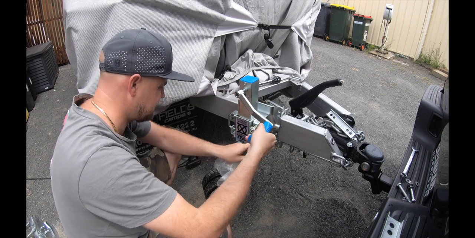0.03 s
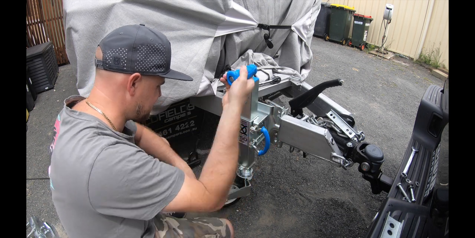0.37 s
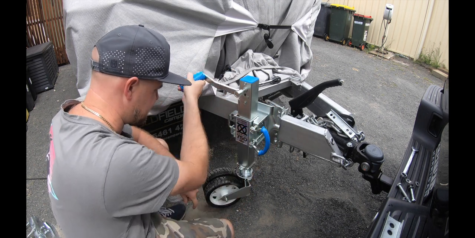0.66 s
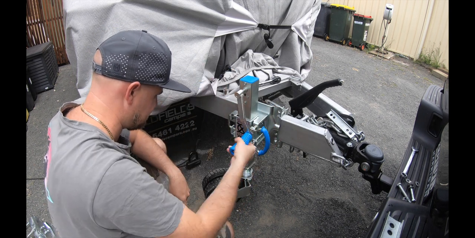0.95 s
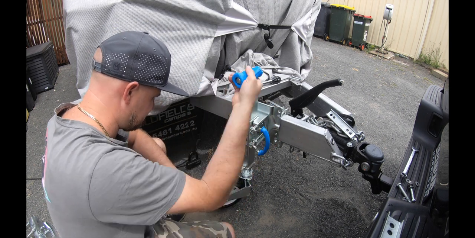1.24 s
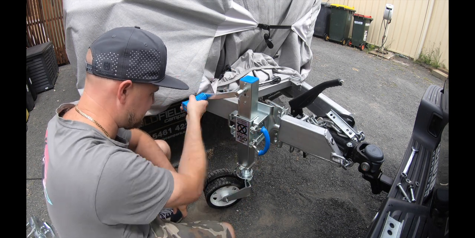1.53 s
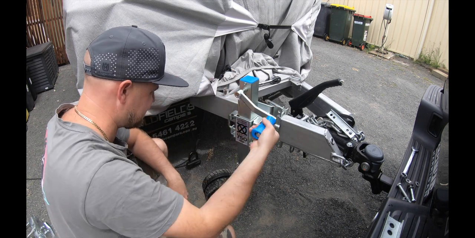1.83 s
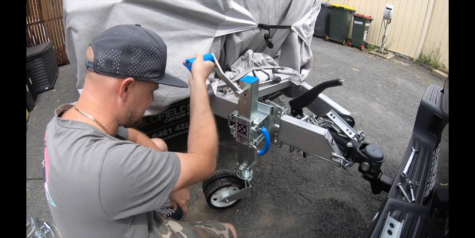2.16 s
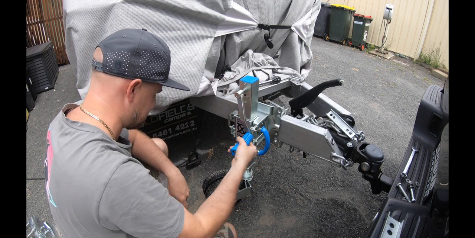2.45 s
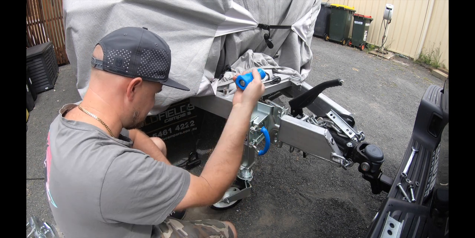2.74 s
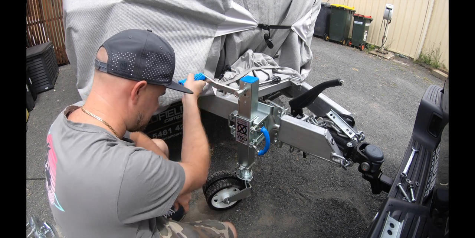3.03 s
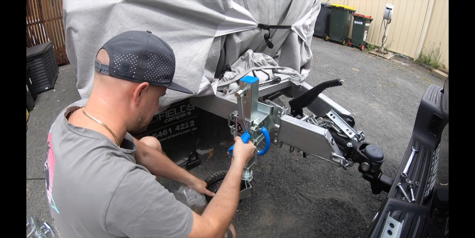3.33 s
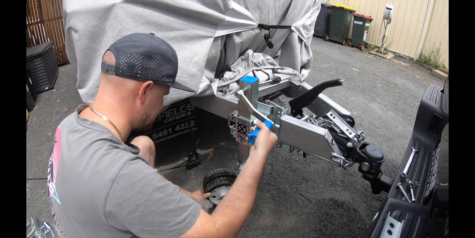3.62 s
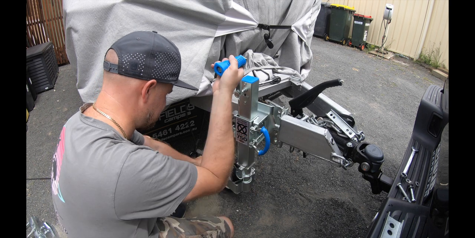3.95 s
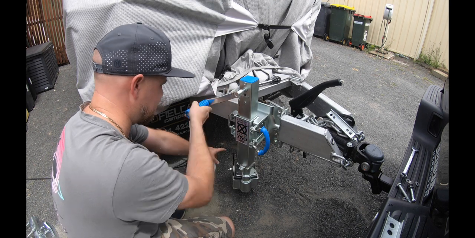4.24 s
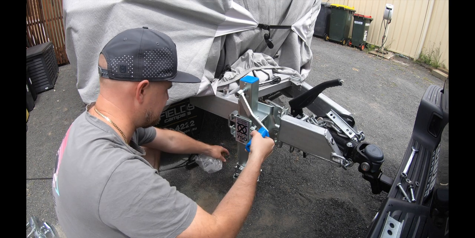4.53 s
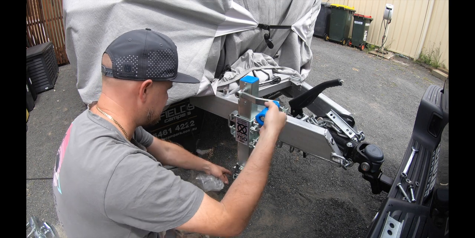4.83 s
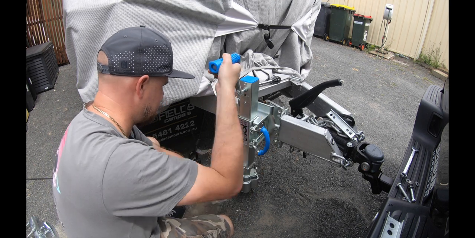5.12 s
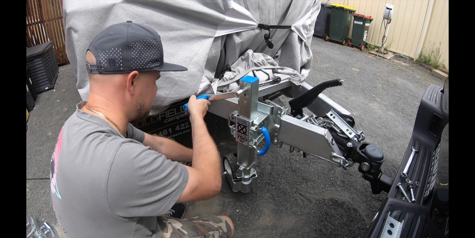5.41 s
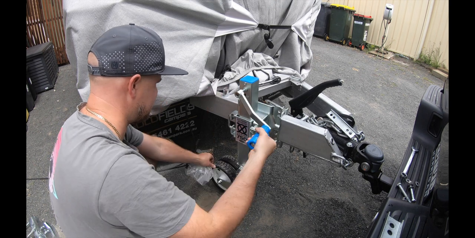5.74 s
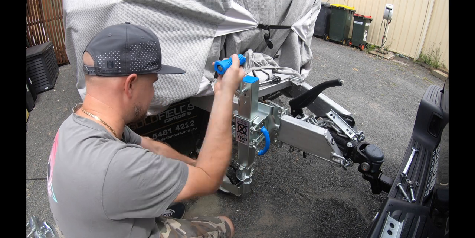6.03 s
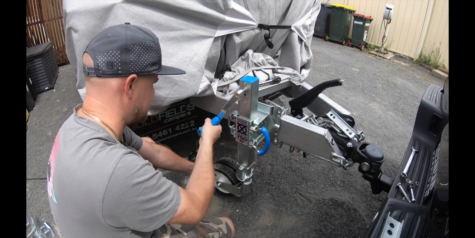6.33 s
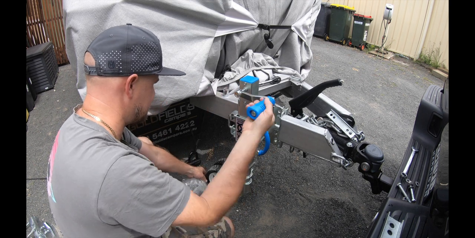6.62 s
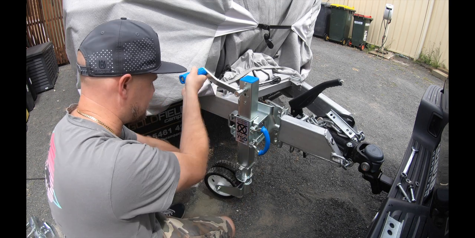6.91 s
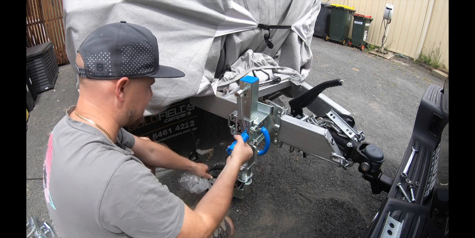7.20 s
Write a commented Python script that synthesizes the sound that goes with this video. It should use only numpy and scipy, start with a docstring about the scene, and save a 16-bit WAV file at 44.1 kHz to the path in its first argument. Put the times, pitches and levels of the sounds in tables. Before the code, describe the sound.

A trailer's jockey wheel is cranked outdoors, with repeated metal clanks, knocks and ticks over a low wind rumble.

```python
"""A paved yard, a stereo camera microphone close to the crank of a trailer's jockey wheel.
Light ticks come first. Then, turn after turn, the screw rubs through a tight spot and clanks in its
tube, the drawbar booms, and mostly the loose handle flops over with a knock. Just after 3 s the
rumbling breeze buffets the microphone, and by 4.5 s the image has narrowed to mono. At 5.3 s the screw
squeals into its heaviest clank; a loose steel part clinks brightly before the last turn."""
import sys
import numpy as np
from scipy import signal
from scipy.fft import rfft, irfft, next_fast_len
from scipy.io import wavfile
from scipy.ndimage import uniform_filter1d, map_coordinates

SR = 44100
rng = np.random.default_rng(int(sys.argv[2]) if len(sys.argv) > 2 else 0)


def inscribe(sig):
    """Save sig as 16-bit PCM at rate SR to the path in sys.argv[1].

    A 1-D sig is mono; a 2-D sig holds one channel per row.
    Samples are clipped to [-1, 1] before scaling.
    """
    pcm = np.round(np.clip(np.atleast_2d(sig).T, -1, 1) * 32767)
    wavfile.write(sys.argv[1], SR, pcm.astype(np.int16))


N = 320607
AGE = np.arange(SR // 2) / SR  # seconds since a blow
LEAD_S = 0.03  # room for the drag ahead of a blow


# The screw's tube, close up (levels in all tables are relative). Modes: pitch_hz, level_db, t60_s
TUBE_MODES = [(1283, -12, 0.21), (1480, -19, 0.15), (1760, -3, 0.1), (1990, 2.5, 0.12), (2060, -3, 0.078),
              (2340, -8.5, 0.1), (2710, -1, 0.08), (2790, -8, .1), (3260, -2, 0.11), (3750, 0.5, 0.084),
              (4100, -10, 0.12), (4830, -17, 0.17), (7550, -17, 0.094), (8100, -29, .16)]
# Its dense ring: frequency_hz, level_db
TUBE_CONTACT = [(200, -7), (350, -7), (680, -4), (880, -10.5), (1400, -5.5), (1700, -4), (2000, -6),
                (2400, -2), (2700, -4.5), (3300, -5), (3850, -7.5), (4350, -15.5), (5600, -21), (6800, -28),
                (8200, -29.5), (9500, -43), (13000, -52)]
# Blows on the tube: start_s, level_db, treble_db, clunk_db, boom_db, body_db, drag_s, chatter_s
CLANKS = [(0.5345, -31.5, -54.5, -46, -41, -5, 0.009, 0.015),
          (0.5598, -25.5, -54, -32, -31, 4, 0.0032, 0.01), (0.5889, -32, -53, -33, -28.5, 5, 0.0071, 0.019),
          (1.3994, -32, -47, -58, -54, -8, 0.021, .02), (1.4161, -30, -66, -46, -31, 8.5, .01, 0.021),
          (2.1751, -27.5, -43, -52, -37, -2, 0.029, 0.016), (2.188, -25, -51, -45, -26, 4, 0.0072, 0.019),
          (2.8735, -27, -48, -35, -40, -10, 0.0084, 0.015),
          (2.8979, -21.5, -43.5, -28, -25, 2, 0.012, .014),
          (3.7445, -27.5, -61, -29, -37, 2.5, 0.0059, .01),
          (3.8747, -30.5, -65, -32, -39.5, 7.5, 0.0054, .014),
          (4.108, -25.5, -50, -37, -34.5, 0.5, 0.017, 0.012),
          (5.3112, -9.5, -34.5, -18.5, -21, -6.5, .028, 0.024),
          (6.086, -28.5, -55, -45, -53, 2, 0.011, 0.014),
          (6.126, -12.5, -37.5, -30, -28.5, -3, 0.03, 0.015),
          (6.8209, -30, -46.5, -49, -26.5, -5, 0.0083, 0.023)]
def clanks():
    """The screw takes up its play, strikes its tube and shakes the frame."""
    out = np.zeros((2, N))
    for start, db, treble_db, clunk_db, boom_db, body_db, drag, chatter in CLANKS:
        force = rattle(chatter, drag, bounce_db=-4.5, drag_db=-18)
        hit = weighted(steel(force, TUBE_CONTACT, TUBE_MODES, ring_db=-7), body_db)
        add(out, start - LEAD_S, strength(hit, db - 6.5, treble_db - 3))
        add(out, start, frame(clunk_db, boom_db))
    return out


# The handle's modes: pitch_hz, level_db, t60_s
HANDLE_MODES = [(1618, 0.5, 0.12), (1694, 11.5, 0.052), (1750, -0.5, 0.095), (1975, 1.5, 0.073),
                (2082, 4.5, 0.061), (3280, 1, 0.068), (3450, -14, 0.058), (3800, -14, 0.047),
                (4910, -17, 0.15), (5570, -5, 0.025), (6100, -12, 0.06), (6380, -8, 0.034),
                (7400, -10, 0.06), (8500, -25, 0.16)]
# Its dense ring: frequency_hz, level_db
HANDLE_CONTACT = [(200, -18), (400, -5.5), (1000, -5.5), (1300, -4.5), (1600, -7.5), (1800, 3), (2050, -6),
                  (2400, -6), (2850, -2.5), (3150, 3), (3850, 0.5), (4350, -12), (5600, -4.5),
                  (8000, -22.5), (9500, -26.5), (13000, -50.5)]
# Its falls: start_s, level_db, treble_db, clunk_db, boom_db, body_db, drag_s, chatter_s
KNOCKS = [(0.6432, -28, -53, -32.5, -37, 3.5, 0.011, .012),
          (1.4962, -24, -44, -29.5, -32.5, 3, .008, 0.0098),
          (2.27, -21, -41, -28, -27.5, 3, 0.0071, 0.0087),
          (2.9981, -17, -35, -27.5, -31, 1, 0.0024, 0.0076),
          (6.2326, -23.5, -49, -27.5, -37, 5.5, 0.018, 0.018),
          (6.9336, -29.5, -60, -35, -51, 11, .004, .009), (6.9431, -25.5, -52, -18, -23.5, 9, 0.007, .012)]
def knocks():
    """The loose handle flops over and lands with a knock that shakes the frame."""
    out = np.zeros((2, N))
    for start, db, treble_db, clunk_db, boom_db, body_db, drag, chatter in KNOCKS:
        force = rattle(chatter, drag, bounce_db=-5.5, drag_db=-33.5)
        hit = weighted(steel(force, HANDLE_CONTACT, HANDLE_MODES, ring_db=-3.5), body_db)
        add(out, start - LEAD_S, strength(hit, db - 5, treble_db - 0.5))
        add(out, start, frame(clunk_db, boom_db))
    return out


# Modes of the clamp and the drawbar: pitch_hz, level_db, t60_s
CLAMP_MODES = [(443, -9.5, 0.1), (566, -3.5, 0.19), (620.5, 1.5, 0.096), (705, 3.5, 0.048),
               (770, -24, 0.017)]
DRAWBAR_MODES = [(126, -13, 0.41), (181.4, -3.5, 0.22), (205.5, -2, 0.15), (249.8, -15, 0.6),
                 (280.7, -8, 0.28), (330.5, -1.5, 0.13), (391.4, -8.5, 0.17)]
def frame(clunk_db, boom_db):
    """The clamp clunks at once; the heavy drawbar takes a moment to swing up."""
    clunk = crest(ring(CLAMP_MODES) * (1 - np.exp(-AGE / 0.0036)))
    boom = crest(ring(DRAWBAR_MODES) * (1 - np.exp(-(AGE / 0.023) ** 2)))
    return amp(clunk_db - 7.5) * clunk + amp(boom_db - 3) * boom


# Second strikes on the tube: start_s, level_db, treble_db
REBOUNDS = [(0.5665, -26.5, -51), (0.5735, -34, -52), (1.4065, -28.5, -48), (2.1905, -35, -52),
            (2.886, -27, -60), (2.9048, -20.5, -46), (2.9135, -29.5, -51), (4.1165, -33.5, -56),
            (4.1225, -28.5, -58), (5.3435, -24.5, -58), (5.3635, -29, -56), (6.161, -31.5, -56),
            (6.8325, -26, -58), (6.9695, -31, -56)]
def rebounds():
    """The screw springs back and strikes its tube again, with hardly any chatter."""
    out = np.zeros((2, N))
    for start, db, treble_db in REBOUNDS:
        force = rattle(chatter_s=0.003, drag_s=0.001, bounce_db=-29, drag_db=-33)
        hit = steel(force, TUBE_CONTACT, TUBE_MODES, ring_db=-18)
        add(out, start - LEAD_S, strength(hit, db - 7.5, treble_db - 7.5))
    return out


# Touches of the crank: start_s, level_db, treble_db
TICKS = [(0.1045, -38.5, -48), (0.286, -50, -72), (0.3099, -38, -76.5), (0.4797, -39, -57),
         (0.4995, -45, -52), (0.6358, -38, -59), (0.716, -40, -66), (0.9206, -37.5, -48.5),
         (1.0254, -41, -72), (1.3725, -36.5, -54), (1.476, -29, -54), (1.6267, -43, -66),
         (1.6854, -42, -57), (1.9795, -42, -57), (2.1086, -40.5, -66), (2.2493, -33, -58),
         (2.369, -35.5, -63), (2.4197, -40, -45.5), (2.499, -41, -60), (2.514, -40, -55),
         (2.5292, -47, -55), (2.589, -38.5, -56), (2.7362, -43, -66), (2.8003, -37, -63), (2.972, -29, -57),
         (3.0819, -39.5, -53), (3.256, -40, -51), (3.353, -42.5, -47.5), (3.617, -35.5, -53.5),
         (3.6905, -37.5, -68), (3.7249, -32, -60), (3.819, -33.5, -74), (3.968, -35.5, -49),
         (4.0703, -35.5, -62), (4.1984, -47, -70), (4.3176, -44, -65), (4.888, -36.5, -51),
         (4.9396, -35.5, -51), (5.0845, -33, -57), (5.1705, -36, -55), (5.245, -33, -65), (5.774, -34, -66),
         (6.0315, -30.5, -61), (6.115, -39, -44), (6.2263, -28, -47), (6.344, -39, -58), (6.351, -38, -58),
         (6.5364, -45, -51), (6.585, -32.5, -59), (6.6031, -33, -71), (6.6813, -32.5, -78)]
def ticks():
    """Light, chattering touches of the crank barely ring the tube."""
    out = np.zeros((2, N))
    for start, db, treble_db in TICKS:
        force = rattle(chatter_s=0.01, drag_s=0.0065, bounce_db=-3.5, drag_db=-16)
        hit = steel(force, TUBE_CONTACT, TUBE_MODES, ring_db=-18)
        add(out, start - LEAD_S, strength(hit, db - 10, treble_db - 6.5))
    return out


# The loose part's modes: pitch_hz, level_db, t60_s
CLINK_MODES = [(2300, -15, .03), (3600, -10, 0.05), (4900, 1, 0.036), (5000, -2, 0.045),
               (7470, -13.5, 0.046), (7490, -25, .15)]
# Its dense ring: frequency_hz, level_db
CLINK_CONTACT = [(1500, -9), (2400, 3), (4200, -5.5), (5000, 6), (6000, -20), (7500, -20), (9000, -24),
                 (14000, -16)]
# Its slips: start_s, level_db, drag_s
CLINKS = [(5.774, -44, 0.0037), (6.538, -34.5, 0.017), (6.582, -52, 0.0022)]
def clinks():
    """A small loose steel part slips and rings brightly."""
    out = np.zeros((2, N))
    for start, db, drag in CLINKS:
        force = rattle(chatter_s=0.019, drag_s=drag, bounce_db=-16, drag_db=-16)
        add(out, start - LEAD_S, amp(db) * steel(force, CLINK_CONTACT, CLINK_MODES, ring_db=2.5))
    return out


# Short dry scrapes of the crank: start_s, length_s, level_db, centre_hz
SCRAPES = [(0.283, 0.02, -45, 2180), (0.39, .04, -52, 1500), (2.496, 0.078, -43.5, 1090),
           (3.677, 0.088, -47, 2010), (4.107, 0.032, -35.5, 1200), (4.315, 0.096, -48.5, 2380),
           (6.783, 0.024, -44.5, 2020), (6.831, .024, -40, 1500)]
def scrapes(slips_per_s=450, slip_t60_s=0.019):
    """Steel drags over steel: a run of tiny slips that starts quickly and eases off."""
    out = np.zeros((2, N))
    for start, length, db, centre_hz in SCRAPES:
        colour = [(centre_hz / 4, -18), (centre_hz / 2.6, -3), (centre_hz, 0), (centre_hz * 1.68, -5),
                  (4200, -13), (6500, -30), (12000, -65)]
        stroke = np.sin(np.pi * np.clip(AGE / length, 0, 1) ** 0.31)
        slips = (rng.random(len(AGE)) < slips_per_s / SR) * stroke
        envelope = signal.fftconvolve(slips, amp(-60 * AGE / slip_t60_s))[:len(AGE)]
        grains = envelope * noise([(1000, 0)], len(AGE))
        add(out, start, amp(db) * crest(filtered(grains, lambda hz: amp(along(colour, hz)))))
    return out


# The screw forced into its heaviest clank: start_s, length_s, level_db
SQUEALS = [(5.293, 0.043, -51)]
def squeal(pitch_hz=7900, waver=0.006):
    """Dry steel sticks and slips at one high, slightly unsteady pitch."""
    out = np.zeros((2, N))
    hz = pitch_hz * (1 + waver * wobble(400))
    tone = np.sin(2 * np.pi * np.cumsum(hz) / SR)
    for start, length, db in SQUEALS:
        size = round(length * SR)
        add(out, start, amp(db) * tone[None, :size] * signal.windows.tukey(size, 0.5))
    return out


# The screw at its tight spots, and running freely between them: time_s, drone_db, rub_db
TIGHT_SPOTS = [(0.602, -39.5, -53), (1.499, -40.5, -53.5), (2.333, -45.5, -52.5), (2.96, -47.5, -58),
               (3.75, -41.5, -51.5), (4.141, -46, -47.5), (5.3, -34.5, -50), (6.16, -39, -51.5),
               (6.88, -36.5, -51)]
FREE_RUNNING = [(0, -54, -56), (1.1, -49.5, -57.5), (2.8, -51, -55.5), (4.6, -50, -53), (5.7, -45, -52),
                (7.27, -42.5, -50)]
# Colours of the screw's rub and the drawbar's drone: frequency_hz, level_db
RUB_COLOUR = [(260, -8), (450, 0.5), (547, 0), (637, -0.5), (930, -6), (1210, -7.5), (1550, -7.5),
              (1900, -8.5), (2360, -10.5), (3720, -15), (4060, -16.5), (6000, -31.5), (7800, -75),
              (13200, -120)]
DRONE_COLOUR = [(60, -54.5), (120, -6), (180, 2.5), (260, -3.5), (350, -7.5), (460, -19), (580, -26.5),
                (900, -31.5), (2500, -61.5)]
def screw(slips_per_s=45):
    """The screw rubs, catches in tiny slips and keeps the drawbar droning, most at the tight spots."""
    free_drone_db, free_rub_db = curves(FREE_RUNNING)
    times, tight_drone_db, tight_rub_db = np.transpose(TIGHT_SPOTS)
    drone_gain = np.hypot(amp(free_drone_db), swells(times, tight_drone_db, rise_s=0.11, fall_s=0.21))
    rub_gain = np.hypot(amp(free_rub_db), swells(times, tight_rub_db, rise_s=0.28, fall_s=0.29))
    grip = wobble(22)
    slips = (rng.random(N) < slips_per_s / SR) * rng.standard_normal(N) * amp(3.9 * grip)
    creak = unit(excited(fading(noise(RUB_COLOUR, len(AGE)), STEEL_DECAY), slips, N))
    rub = amp(grip + 1.2 * wobble(130)) * noise(RUB_COLOUR, N)
    drone = amp(1 + 1.13 * grip) * noise(DRONE_COLOUR, N)
    return rub_gain * (rub + amp(-8) * creak) + drone_gain * drone


# Dull low bumps: start_s, level_db, pitch_hz, left_over_right_db
BUMPS = [(0.579, -21.5, 150, 2), (0.592, -26, 117, -2), (0.607, -27, 290, -2), (0.681, -26, 104, -7),
         (0.81, -31, 74.6, -16), (0.954, -30.5, 73, -25), (1.438, -22.5, 141, -1), (1.523, -24, 130, -7),
         (2.206, -23.5, 150, 5), (2.29, -26, 130, -2), (2.925, -26, 135, -2), (3.022, -22, 127, -7),
         (3.801, -23, 91, -4), (4.141, -27, 85, 1), (4.246, -25.5, 55, 0), (4.268, -25, 71, 0),
         (5.342, -15, 290, 0), (5.927, -27.5, 64.6, 0), (6.154, -30, 70, 1), (6.174, -23, 133, -2),
         (6.29, -36, 55.5, 5), (6.7, -29, 205, 0), (6.874, -24.5, 217, 0)]
def bumps(rise_cycles=0.31, t60_cycles=3.35):
    """Each bump is one soft low push that dies within a few cycles."""
    out = np.zeros((2, N))
    for start, db, hz, pan_db in BUMPS:
        cycles = hz * AGE
        rise = 1 - np.exp(-(cycles / rise_cycles) ** 2)
        push = np.sin(2 * np.pi * cycles) * rise * amp(-60 * cycles / t60_cycles)
        add(out, start, panned(db, pan_db) * push / np.abs(push).max())
    return out


# Wind striking the microphone: centre_s, level_db, half_length_s, edge_hz, left_over_right_db
BUFFETS = [(3.209, -15.5, 0.013, 117, -6), (3.248, -15.5, 0.0045, 273, -14), (3.276, -19, 0.017, 262, -4.5),
           (3.321, -15.5, 0.0036, 283, -11), (3.338, -14.5, 0.0032, 230, -17.5),
           (3.37, -35, 0.036, 184, -27), (4.181, -36, 0.088, 102, 0)]
def buffets():
    """Eddies thump on each microphone port differently."""
    out = np.zeros((2, N))
    middle = AGE.mean()
    for centre, db, half, edge_hz, pan_db in BUFFETS:
        colour = [(20, -14), (edge_hz / 2, 0), (edge_hz, -3), (edge_hz * 3.43, -33), (edge_hz * 12, -95)]
        envelope = np.exp(-((AGE - middle) / half) ** 2 / 2)
        eddy = noise(colour, len(AGE), width=[(100, -0.38)]) * envelope
        eddy /= np.sqrt(np.sum(eddy ** 2, axis=1, keepdims=True) / (2 * half * SR))
        add(out, centre - middle, panned(db - 3, pan_db) * eddy)
    return out


# Wind rumble at the microphone: time_s, level_db
RUMBLE_LEVEL = [(.45, -49), (.72, -45), (1.55, -42), (2.75, -45), (3.13, -43), (3.23, -32.5), (3.5, -39.5),
                (3.95, -38.5), (4.25, -38), (4.4, -45), (5.08, -52.5), (5.28, -41.5), (5.75, -46),
                (6.28, -37), (6.42, -55), (6.83, -52), (6.95, -36), (7.27, -46)]
# Its colour: frequency_hz, level_db
RUMBLE_COLOUR = [(12, -10), (28, 1.5), (50, 2), (80, -4), (120, -6.5), (200, -16.5), (500, -74)]
def breeze():
    """An unsteady low wind rumble."""
    rumble_db, = curves(RUMBLE_LEVEL)
    return amp(rumble_db + 3.5 + 2.5 * wobble(14)) * noise(RUMBLE_COLOUR, N)


# The rustle: time_s, level_db
RUSTLE_LEVEL = [(0, -68.5), (.35, -73.5), (1.25, -76.5), (1.55, -70.5), (1.98, -77), (2.4, -72),
                (2.85, -78), (3.15, -68.5), (3.55, -70), (3.8, -80), (4.4, -75.5), (4.7, -81), (5.5, -73.5),
                (7.27, -78)]
# Its colour: frequency_hz, level_db
RUSTLE_COLOUR = [(3500, -21), (5500, 2.5), (8000, 2.5), (9300, -6), (10500, -7), (14000, -41)]
def rustle():
    """A faint high rustle, like a sleeve moving, comes and goes."""
    rustle_db, = curves(RUSTLE_LEVEL)
    return amp(rustle_db - 2) * noise(RUSTLE_COLOUR, N)


# Colour of the fine crackle: frequency_hz, level_db
CRACKLE_COLOUR = [(1000, -11), (3000, 8), (5500, 1), (8000, -10), (10000, -17), (13500, -31)]
def crackle(grains_per_s=33):
    """Tiny dry ticks, like grit under the wheel, come and go with the rustle."""
    rustle_db, = curves(RUSTLE_LEVEL)
    impulses = (rng.random(N) < grains_per_s / SR) * amp(-rng.standard_normal(N))
    grain = noise(CRACKLE_COLOUR, len(AGE)) * amp(-60 * AGE / 0.0094)
    return amp(rustle_db + 2.5) * unit(excited(grain, impulses, N))


# Decay of the paved yard: frequency_hz, t60_s
YARD_DECAY = [(150, 0.64), (400, 0.3), (1000, 0.34), (3000, 0.18), (8000, 0.15)]
def yard(x):
    """The fence, paving and trailer answer with a short scattered tail."""
    tail = fading(noise([(4000, -14), (10000, -5)], len(AGE)), YARD_DECAY)
    tail *= 1 - np.exp(-AGE / 0.039)
    return excited(tail / np.linalg.norm(tail[0]), x.mean(0), N)


# Decay of the steel's dense ring: frequency_hz, t60_s
STEEL_DECAY = [(300, 0.31), (1000, 0.1), (3000, 0.05), (9000, 0.054)]
def steel(force, contact, modes, ring_db, crack_db=-5, crack_t60_s=0.014):
    """Every slip and bounce cracks and feeds a dense, quickly dying ring; a few modes ring on."""
    size = len(AGE)
    hz, t, spectrum = signal.stft(noise(contact, size), SR, nperseg=128)
    time_slot = np.round(np.arange(len(force)) / SR / t[1]).astype(int)
    energy_in = np.bincount(time_slot, force ** 2)
    decay = amp(-60 * t / along(STEEL_DECAY, hz)[:, None])
    energy = excited(decay ** 2, energy_in, len(t))
    dense = signal.istft(spectrum * np.sqrt(np.abs(energy)), SR, nperseg=128)[1][:, :size]
    crack = excited(noise(contact, size) * amp(-60 * AGE / crack_t60_s), force, size)
    tones = excited(ring(modes, flutter_db=2.5), force, size)
    return crest(crest(dense) + amp(crack_db) * crest(crack) + amp(ring_db) * crest(tones))


def rattle(chatter_s, drag_s, bounce_db, drag_db):
    """The force of a blow at LEAD_S: tiny slips swell into it and a few bounces die away after it."""
    force = np.zeros(SR // 8)
    slip, slip_size = rng.random(32), rng.standard_normal(32)
    bounce, bounce_size = rng.random(12), rng.standard_normal(12)
    slip_s = LEAD_S - slip * min(drag_s, LEAD_S)
    bounce_s = LEAD_S + bounce * min(chatter_s, 2 * LEAD_S)
    force[(slip_s * SR).astype(int)] = slip_size * amp(drag_db - 20 * slip)
    force[(bounce_s * SR).astype(int)] = bounce_size * amp(bounce_db - 20.6 * bounce)
    force[round(LEAD_S * SR)] = 1
    return force


def weighted(hit, body_db, body_hz=1820):
    """A broader, softer contact puts more of its ring into the lower modes."""
    return crest(filtered(hit, lambda hz: amp(body_db / (1 + (hz / body_hz) ** 8))))


def strength(hit, db, treble_db):
    """Set a hit's level; a harder contact carries more treble."""
    body = signal.sosfilt(signal.butter(8, 4800, fs=SR, output="sos"), hit)
    treble = signal.sosfilt(signal.butter(6, 5000, "high", fs=SR, output="sos"), hit)
    return amp(db) * body + amp(treble_db) * crest(treble)


# Stereo width at the microphone: frequency_hz, side_over_mid_db
WIDTH = [(60, -10.5), (100, 2.5), (180, -16), (320, -12.5), (560, -11.5), (970, -3), (1700, -9),
         (2970, -13), (5190, -9), (9070, -1.5)]
def ring(modes, scatter_db=1.04, flutter_db=0, flutter_per_s=220):
    """Damped modes reach the two ports each in its own phase; loose joints make them flutter."""
    hz, db, t60 = np.transpose(modes)[:, :, None]
    scatter, phase, skew = rng.standard_normal((3, len(modes), 1))
    knots = rng.standard_normal((len(modes), 256))
    flutter = np.array([np.interp(AGE * flutter_per_s, np.arange(256), row) for row in knots])
    envelopes = amp(db + scatter_db * scatter + flutter_db * flutter - 60 * AGE / t60)
    waves = envelopes * np.exp(2j * np.pi * (hz * AGE + phase))
    mid = waves.imag.sum(0)
    side = (waves.real * np.sign(skew) * amp(along(WIDTH, hz))).sum(0)
    return crest(np.array([mid + side, mid - side]))


def noise(colour, size, width=WIDTH):
    """Stereo noise of rms 1 with a given colour and width."""
    white = rng.standard_normal((2, size))
    mid, side = filtered(white, lambda hz: amp(along(colour, hz)) * amp([0 * hz, along(width, hz)]))
    return unit(np.array([mid + side, mid - side]))


def fading(x, t60s):
    """Each frequency of x dies at its own speed."""
    hz, t, spectrum = signal.stft(x, SR, nperseg=128)
    decay = amp(-60 * t / along(t60s, hz)[:, None])
    return signal.istft(spectrum * decay, SR, nperseg=128)[1][:, :x.shape[1]]


def swells(times, levels_db, rise_s, fall_s):
    """A gain that builds up to each time and eases off after it."""
    since = np.arange(N) / SR - times[:, None]
    shape = np.exp(-np.abs(since) / np.where(since < 0, rise_s, fall_s))
    return (amp(levels_db)[:, None] * shape).max(0)


def excited(response, drive, size):
    """Each row of a response convolved with one driving signal."""
    return signal.fftconvolve(response, drive[None], axes=1)[:, :size]


def filtered(x, response):
    """x through a gain that depends on frequency."""
    size = x.shape[-1]
    padded = next_fast_len(size + SR // 10)
    return irfft(rfft(x, padded) * response(np.fft.rfftfreq(padded, 1 / SR)), padded)[..., :size]


def amp(db):
    """Decibels to gain."""
    return 10 ** (np.asarray(db) / 20)


def panned(db, pan_db):
    """Left and right gains, pan_db apart."""
    return amp(db + np.array([[pan_db], [-pan_db]]) / 2)


def unit(x):
    """Scale a stereo sound so that its middle has rms 1."""
    return x / np.sqrt(np.mean(x.mean(0) ** 2) + 1e-20)


def crest(x):
    """Scale a stereo hit so that its loudest few milliseconds have rms 1."""
    return x / np.sqrt(uniform_filter1d(x.mean(0) ** 2, size=256).max())


def along(points, hz):
    """Interpolate (frequency_hz, value) points on a log axis."""
    frequencies, values = np.transpose(points)
    return np.interp(np.log(hz + 1), np.log(frequencies), values)


def curves(rows):
    """One value per sample for each column after the time."""
    times, *columns = np.transpose(rows)
    return [np.interp(np.arange(N) / SR, times, column) for column in columns]


def wobble(rate):
    """A smooth random curve, rate knots a second."""
    return map_coordinates(rng.standard_normal(int(N * rate / SR) + 4), [np.arange(N) * rate / SR])


def add(track, start_s, sound):
    """Mix a sound into the track."""
    part = track[:, max(round(start_s * SR), 0):][:, :sound.shape[1]]
    part += sound[:, :part.shape[1]]


def scene():
    """The jack close by, the yard's echo, wind and a faint rustle, all slightly to the right."""
    jack = clanks() + knocks() + rebounds() + ticks() + clinks() + scrapes() + squeal()
    mix = jack + amp(-12) * yard(jack) + bumps() + screw() + crackle() + breeze() + rustle() + buffets()
    return mix * panned(0, pan_db=-1.6)


# The camera's stereo image closing: time_s, bass_side_db, treble_side_db
NARROWING = [(0, -1.5, 5), (3.1, -3, 5), (3.3, 2.5, 9), (3.6, 3, -6), (3.9, -2, -23), (4.3, -3, -40),
             (4.5, -40, -72), (7.27, -72, -38)]
def record(dry, split_hz=600, top_hz=14200):
    """The image closes to mono, treble first; the top rolls off towards the band limit."""
    mid, side = (dry[0] + dry[1]) / 2, (dry[0] - dry[1]) / 2
    bass_db, treble_db = curves(NARROWING)
    bass = filtered(side, lambda hz: 1 / (1 + (hz / split_hz) ** 4))
    side = amp(bass_db) * bass + amp(treble_db) * (side - bass)
    roll_off = [(8500, -1.5), (10500, -8), (14000, -22)]  # frequency_hz, gain_db
    dull = filtered(np.array([mid + side, mid - side]), lambda hz: amp(along(roll_off, hz)))
    return filtered(dull, lambda hz: 1 / np.sqrt(1 + (hz / top_hz) ** 60))


dry = scene()
out = record(dry)
inscribe(out)
```